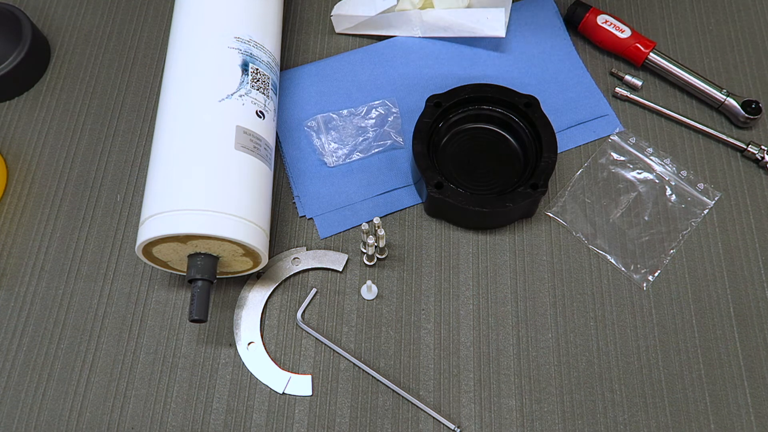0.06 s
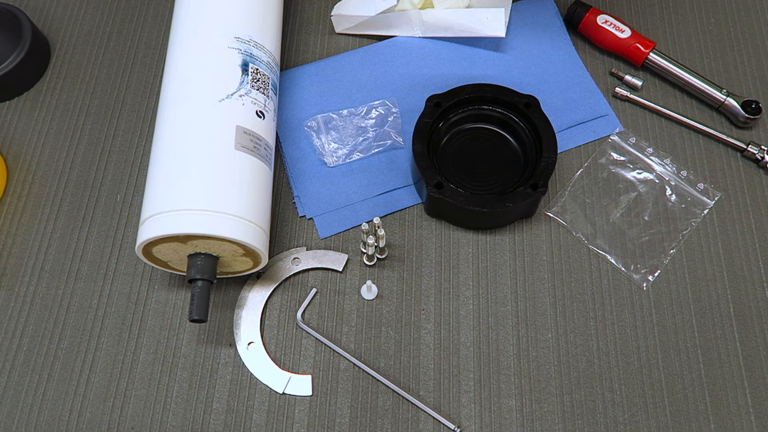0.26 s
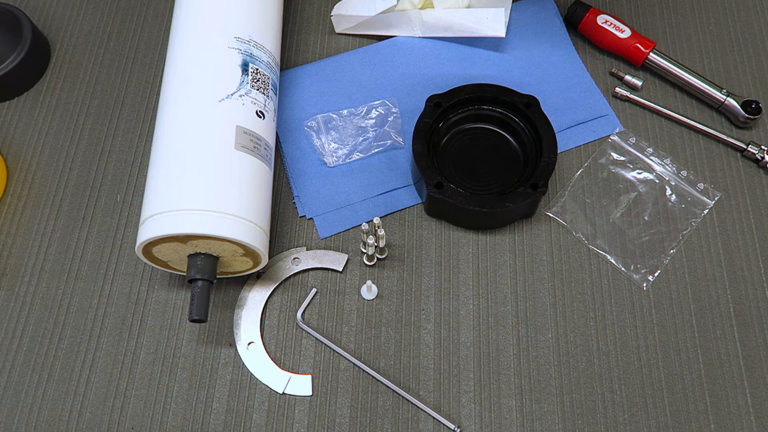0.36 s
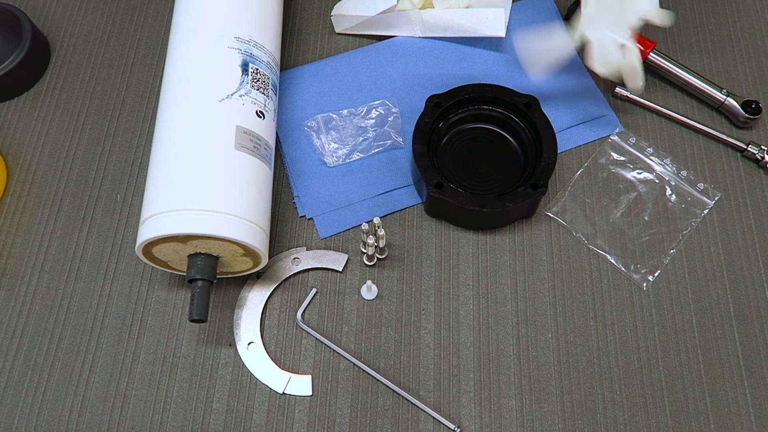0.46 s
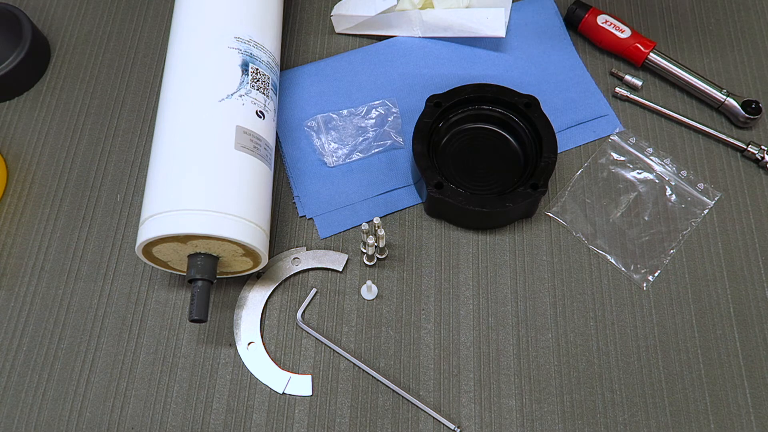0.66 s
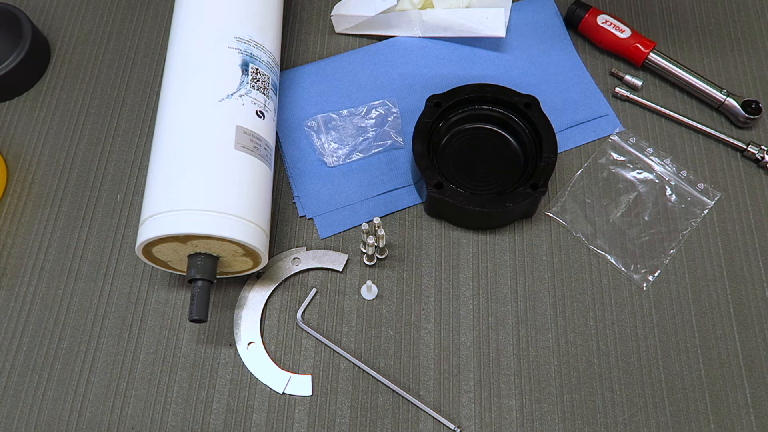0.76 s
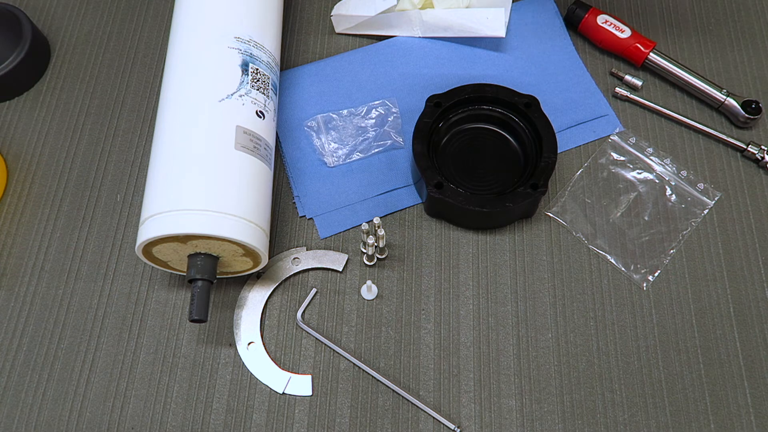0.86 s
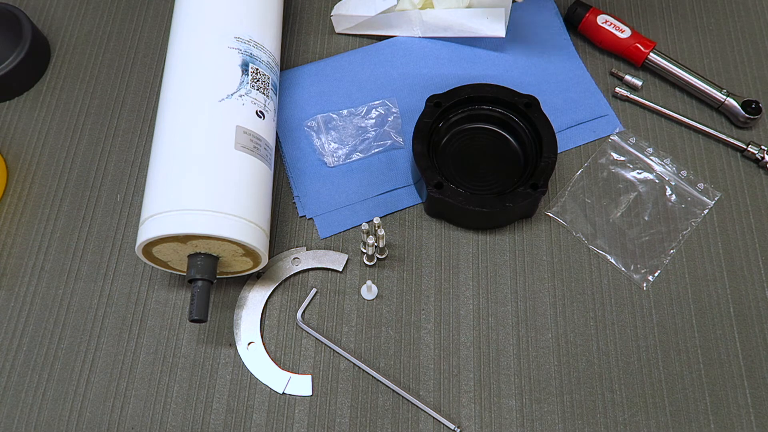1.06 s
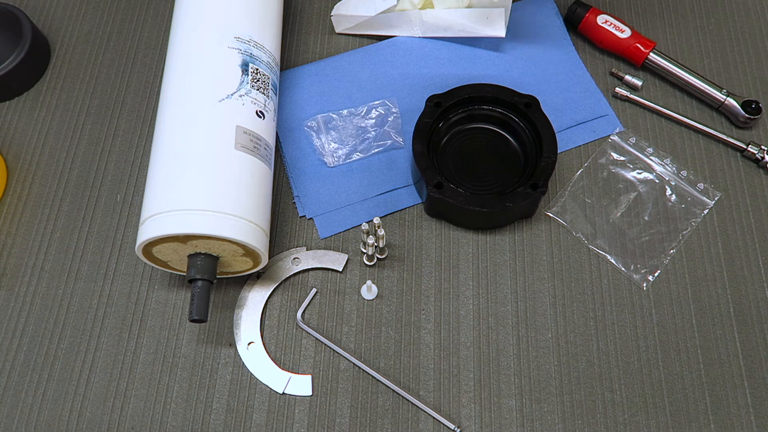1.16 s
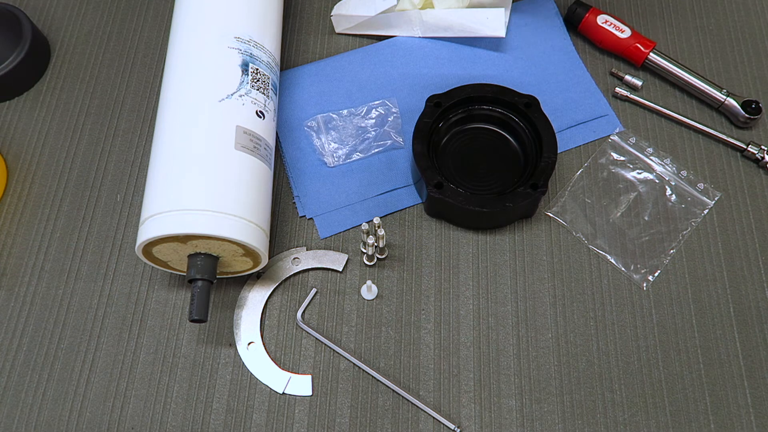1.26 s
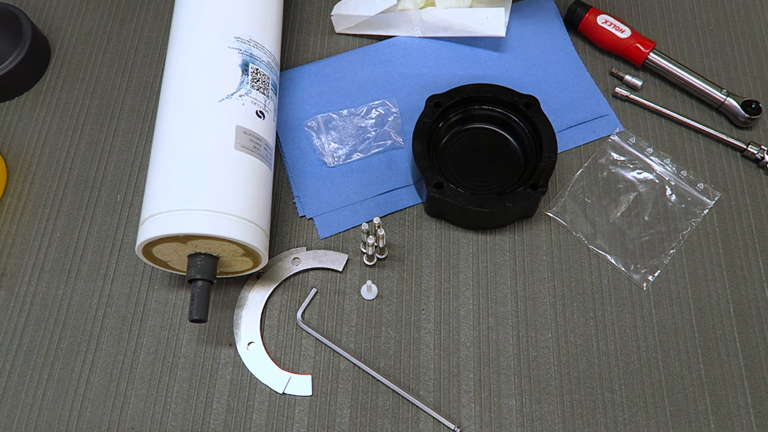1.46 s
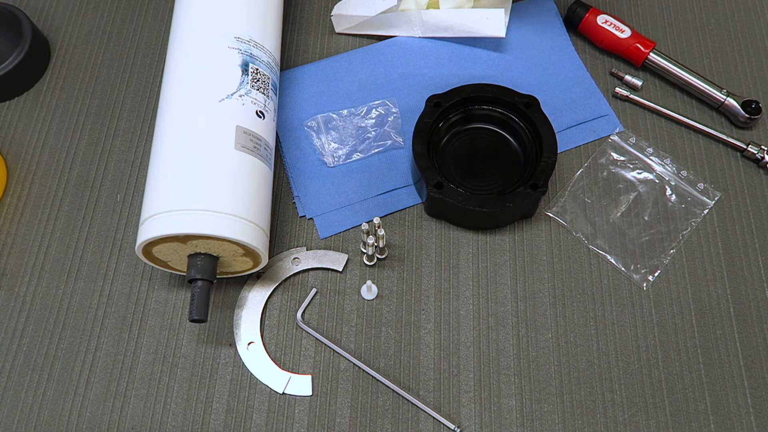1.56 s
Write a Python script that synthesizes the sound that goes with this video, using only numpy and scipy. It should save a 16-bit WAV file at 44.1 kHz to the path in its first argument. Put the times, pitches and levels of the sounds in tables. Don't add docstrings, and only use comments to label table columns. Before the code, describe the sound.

A rubber glove ticks and crackles as it peels, then snaps off loudly close to the microphones; a second, softer snap follows farther off, echoing in a hard room before quiet ventilation noise.

```python
import sys
import numpy as np
from scipy import signal
from scipy.fft import rfft, irfft, next_fast_len
from scipy.io import wavfile
from scipy.ndimage import map_coordinates

SR = 44100
rng = np.random.default_rng(int(sys.argv[2]) if len(sys.argv) > 2 else 0)


def magnitude_from_level(level_db):
    exponent = np.asarray(level_db, float) / 20
    return 10 ** exponent


def wav_out(sig):
    wavfile.write(sys.argv[1], SR, np.round(np.clip(np.atleast_2d(sig).T, -1, 1) * 32767).astype(np.int16))


N = 70560

# (time [s], peak level [dB], pitch [Hz], ring [cycles])
TICKS = [(.004, -32.5, 4100, 8.5), (.038, -35.5, 13000, 3.92), (.0468, -42, 11000, 4.5),
         (.0503, -27, 4500, 2.5), (.0875, -45, 11000, 1.4), (.0916, -44, 10000, 6.3),
         (.097, -45, 5000, 3.7), (.109, -30, 4100, 5.1), (.1215, -19.5, 12000, 2.8),
         (.1296, -41, 11000, 3.3), (.1575, -30, 13000, 3.8), (.158, -35, 5000, 4.8),
         (.187, -32.5, 11500, 6.6), (.188, -40, 8000, 5), (.2075, -30, 7000, 4.4), (.2213, -37.5, 4200, 4),
         (.3853, -26.5, 2150, 5), (.3846, -29, 3500, 4), (.385, -40, 6000, 4), (.0753, -50, 11000, 3),
         (.1165, -48, 7000, 3), (.1783, -46, 6500, 3), (.2105, -31.5, 4010, 5), (1.005, -42, 11000, 4),
         (1.2215, -52, 6300, 6), (1.222, -52, 8200, 6), (1.4805, -52, 3000, 5), (1.5255, -59, 6500, 2.82),
         (1.598, -48, 10000, 3)]
# (time [s], peak level [dB], pitch [Hz], ring [cycles])
FLAPS = [(.2396, -12.5, 3300, 6.8), (.2443, -6.5, 3300, 4.2), (.2445, -14, 12500, 7),
         (.2462, -9.5, 3600, 1.4), (.2472, -1.5, 2700, 3), (.2493, -10.5, 2980, 2.8),
         (.2508, -8.5, 1500, 2.4), (.2525, -20, 10500, 3.8), (.2573, -20, 3050, 6), (.460, -27, 10500, 7.7),
         (.4737, -20, 2900, 5), (.4782, -11, 2390, 3.5), (.4795, -15, 1650, 4), (.4808, -9, 2350, 4.4),
         (.4835, -11, 2980, 3.1), (.4755, -18.5, 2950, 5.5), (.5005, -16, 3600, 4), (.504, -11.5, 840, 3.5),
         (.5018, -18, 1700, 5), (.5068, -16, 1300, 3), (.5054, -14, 3160, 7.8), (.5095, -10.5, 1250, 1.5),
         (.5122, -22, 2800, 8), (.2412, -18, 1500, 3), (.2608, -22, 2400, 5), (1.557, -37, 835, 4)]
# (time [s], level [dB], centre [Hz], time to lose 20 dB [s])
RIPS = [(.2015, -38, 7500, .004), (.2068, -32, 2200, .003), (.2103, -28, 6000, .006),
        (.2205, -33, 8500, .005), (.2262, -33, 4200, .005), (.2385, -20, 5000, .005),
        (.2415, -19, 3200, .006), (.2445, -13, 3400, .008), (.2485, -15, 2300, .01),
        (.2555, -24, 3300, .015), (.4597, -24, 8500, .006), (.4625, -29, 10500, .005),
        (.4708, -26, 9500, .006), (.478, -28, 9500, .004), (.4812, -24, 6200, .005),
        (.4998, -24, 4200, .008), (.503, -23, 3800, .008), (.5095, -27, 4500, .008),
        (.4655, -30, 4500, .008), (.474, -27, 4200, .008), (.487, -33, 4000, .015),
        (1.5245, -50, 6000, .005), (1.5278, -49, 2900, .005), (1.5405, -47, 4200, .006),
        (1.5945, -50, 3500, .008)]
# (time [s], level [dB], grain pitch [Hz])
PEEL = [
    (0, -46, 2205),
    (.055, -44.5, 2500),
    (.075, -51, 2500),
    (.1, -43.5, 4000),
    (.14, -52, 2000),
    (.19, -39.5, 1239),
    (.2, -48.5, 2000),
]
# (time [s], level [dB], grain pitch [Hz])
FIRST_PULL = [
    (.199, -55, 4000),
    (0.201, -36.5, 4000),
    (0.21, -36, 4000),
    (0.222, -32, 3200),
    (0.239, -28, 3000),
    (0.247, -14, 5180),
    (.251, -17, 4000),
    (0.26, -23.5, 4060),
    (.275, -63, 3000),
]
# (time [s], level [dB], grain pitch [Hz])
SECOND_PULL = [
    (.445, -44, 2200),
    (.456, -35, 3000),
    (.468, -30, 2800),
    (.477, -25, 2600),
    (.486, -33, 2500),
    (.499, -37, 2500),
    (.502, -23, 2400),
    (.511, -23, 1800),
    (.525, -60, 1930),
]
# (time [s], level [dB], grain pitch [Hz])
SHUFFLE = [
    (1.47, -63.5, 4000),
    (1.489, -59.5, 5000),
    (1.517, -62, 4000),
    (1.527, -48.5, 3200),
    (1.546, -47, 2200),
    (1.563, -54.5, 1200),
    (1.58, -60, 2000),
    (1.6, -55, 3000),
]
# (time [s], peak level [dB], pitch [Hz], ring [cycles])
THUMPS = [(.205, -37, 115.2, 15), (.225, -37, 233, 8), (.246, -23, 450, 4), (.243, -17.5, 375, 5.1),
          (0.216, -28, 305, 5), (.25, -34.5, 69.5, 2.2), (.465, -30, 365, 7), (.545, -34, 354, 9),
          (.48, -41, 76, 2.8), (.503, -20, 505, 5.6), (0.504, -31.5, 234.6, 7.6), (0.505, -37.5, 114, 24),
          (.468, -38, 170, 4), (.508, -37, 168, 8.6), (1.312, -41, 35, 1.5), (1.541, -69, 120, 5),
          (1.55, -44.5, 456, 9.5), (1.546, -42, 840, 8.1)]

# (frequency [Hz], level [dB])
RUBBER_RADIATION = [(20, -59.5), (150, -5), (400, -4), (1000, 0), (6000, 3.5), (12000, 1.5), (15000, 0.5),
                    (16500, -36)]
# (frequency [Hz], time to lose 60 dB [s])
ROOM_DECAY = [(100, 0.47), (300, 0.81), (700, 0.58), (1800, 0.84), (4800, 0.59), (9000, 0.44),
              (13000, 0.41)]
# (frequency [Hz], level [dB])
ROOM_COLOUR = [(130, -25), (220, 3), (330, 9.5), (1000, 3.5), (3000, 0.5), (6000, -1), (14000, 2.5)]
# (frequency [Hz], correlation [-1 to 1])
ROOM_ALIKE = [(60, 1), (240, 0.95), (950, 0.982), (3770, 0.91), (15000, -0.7)]
# (frequency [Hz], side over mid [dB])
DIRECT_SIDE = [(200, -21.5), (500, -17), (2000, -43), (6000, -20), (12000, -10.5)]
# (frequency [Hz], left over right [dB])
MICROPHONE_LEAN = [(100, 0.3), (300, -4), (700, 0)]

# (frequency [Hz], level [dB per Hz])
AIR_COLOUR = [(20, -0.5), (60, -7), (119, -6), (330, -12), (1270, -12.5), (4000, -22.5), (12500, -38),
              (15500, -50)]
# (frequency [Hz], correlation [-1 to 1])
AIR_ALIKE = [(25, 1), (60, .95), (120, .8), (240, 0.2), (950, -0.023), (3770, 0.39), (15000, -0.37)]
# (frequency [Hz], level [dB per Hz])
RUMBLE_COLOUR = [(60, -28.5), (170, -4.5), (450, -3.5), (1000, -19), (2500, -42)]
# (time [s], level [dB])
RUMBLE_SWELL = [
    (0, -46),
    (.2, -43),
    (.8, -59),
    (1.081, -58.5),
    (1.14, -52.5),
    (1.3, -56.5),
    (1.45, -57.5),
    (1.6, -59.5),
]
# (frequency [Hz], rms level [dB], width [Hz])
TONES = [
    (121, -65, 9.5),
    (8070, -82.5, 60),
]

TICK_RISE, FLAP_RISE = 0.18, 0.71
CRACK_DB, CRACK_S, CRACK_OVER = -9, 0.0016, 2.34
RIP_WIDE, RIP_RISE_S = 1.6, .0004
GRAINS_PER_S, GRAIN_CYCLES, SPREAD_OCT = 14000, 1.63, 1.291
SIZE_DB, TILT_DB_PER_OCT = 2.2, 1
FIRST_WET_DB, SECOND_WET_DB, SECOND_S = -11, -7.5, .44
GAP_S = .003
PATHS, FLUTTER_S = 3, .007
AIR_DB = -54
TOP, KNEE, TOP_HZ = .99, 6, 16450


def unit(x):
    return x / np.sqrt(np.mean(x ** 2) + 1e-20)


def along(points, hz):
    f, v = np.transpose(points)
    return np.interp(np.log(hz + 1), np.log(f + 1), v)


def filtered(x, response):
    n = x.shape[-1]
    m = next_fast_len(n + 8192)
    return irfft(rfft(x, m) * response(np.fft.rfftfreq(m, 1 / SR)), m)[..., :n]


def paired(pair, spectrum, alike):
    ends = [(10, -120)] + list(spectrum) + [(21000, -120)]

    def mid_side(hz):
        turn = np.arccos(np.clip(along(alike, hz), -1, 1)) / 2
        return magnitude_from_level(along(ends, hz)) * np.array([np.cos(turn), np.sin(turn)])

    mid, side = filtered(pair, mid_side)
    return unit(np.array([mid + side, mid - side]))


def rings(s, db, hz, cycles, size, rise=.3):
    k = np.arange(size)
    turns = np.clip(hz, 20, 16000)[:, None] * k / SR
    decay_db = 20 * turns / np.maximum(cycles, .3)[:, None]
    waves = magnitude_from_level(db[:, None] - decay_db) * np.sin(2 * np.pi * turns)
    waves = waves * (1 - np.exp(-turns / max(rise, .05)))
    at = np.round(np.clip(s, 0, None) * SR).astype(int)[:, None] + k
    return np.bincount(at.ravel(), waves.ravel(), N + size + SR)[:N]


def gloves():
    rubber = snaps(TICKS, TICK_RISE) + snaps(FLAPS, FLAP_RISE) + rips()
    rubber = rubber + sum(crackle(rows) for rows in (PEEL, FIRST_PULL, SECOND_PULL, SHUFFLE))
    return filtered(rubber, lambda hz: magnitude_from_level(along(RUBBER_RADIATION, hz)))


def snaps(rows, rise):
    s, db, hz, cycles = np.transpose(rows)
    out, t = np.zeros(N + 400), np.arange(300) / SR
    noises = rng.standard_normal((len(s), len(t)))
    for start, level_db, pitch, noise in zip(s, db, hz, noises):
        lowpass = signal.butter(3, min(CRACK_OVER * pitch, .45 * SR), fs=SR, output="sos")
        dull = unit(signal.sosfilt(lowpass, noise))
        out[round(start * SR):][:len(t)] += magnitude_from_level(level_db + CRACK_DB - 20 * t / CRACK_S) * dull
    return out[:N] + rings(s, db + 5, hz, cycles, size=512, rise=rise)


def rips():
    out, t = np.zeros(N + 900), np.arange(800) / SR
    noises = rng.standard_normal((len(RIPS), len(t)))
    for (s, level_db, hz, fade_s), noise in zip(RIPS, noises):
        edges = [hz / RIP_WIDE, min(hz * RIP_WIDE, .45 * SR)]
        band = signal.butter(2, edges, "band", fs=SR, output="sos")
        shape = magnitude_from_level(level_db - 20 * t / max(fade_s, .001)) * (1 - np.exp(-t / RIP_RISE_S))
        out[round(s * SR):][:len(t)] += shape * unit(signal.sosfilt(band, noise))
    return out[:N]


def crackle(rows):
    s, db, hz = np.transpose(rows)
    length_s = s[-1] - s[0]
    count = int(GRAINS_PER_S * .12 * (1 + length_s // .12))
    at = s[0] + rng.random(count) * length_s
    octaves = SPREAD_OCT * rng.standard_normal(count)
    pitch = np.interp(at, s, hz) * 2 ** octaves
    slip_db = SIZE_DB * rng.exponential(size=count) + TILT_DB_PER_OCT * octaves
    cycles = np.full(count, GRAIN_CYCLES)
    even = rings(at, slip_db, pitch, cycles, size=256)
    slips = rings(at, np.interp(at, s, db) + slip_db, pitch, cycles, size=256)
    return slips / np.sqrt(np.sum(even ** 2) / (length_s * SR))


def table():
    return rings(*np.transpose(THUMPS), size=16384)


def ports(x):
    smear = rng.standard_normal(200) * magnitude_from_level(-np.arange(200) / 8)
    smeared = np.convolve(x, smear / np.linalg.norm(smear))[:N]
    side = filtered(smeared, lambda hz: magnitude_from_level(along(DIRECT_SIDE, hz)))
    return np.array([x + side, x - side])


def moving_room(x):
    turn = 2 * np.pi * np.arange(N) / SR / FLUTTER_S
    echo = 0
    for k in range(PATHS):
        share = (1 + np.cos(turn - 2 * np.pi * k / PATHS)) / PATHS
        echo = echo + room(x * share)
    return echo * np.sqrt(2)


def room(x):
    hz, t, z = signal.stft(rng.standard_normal((2, SR)), SR, nperseg=256)
    decay = magnitude_from_level(-60 * t / along(ROOM_DECAY, hz)[:, None])
    tail = signal.istft(z * decay, SR, nperseg=256)[1]
    tail = paired(tail, ROOM_COLOUR, ROOM_ALIKE) / np.sqrt(tail.shape[1])
    tail = tail * np.clip(np.arange(tail.shape[1]) / (GAP_S * SR), 0, 1)
    return signal.fftconvolve(x[None], tail, axes=1)[:, :N]


def background():
    return ventilation() + far_rumble() + tones()


def ventilation():
    return magnitude_from_level(AIR_DB) * paired(rng.standard_normal((2, N)), AIR_COLOUR, AIR_ALIKE)


def far_rumble():
    s, db = np.transpose(RUMBLE_SWELL)
    lumps = map_coordinates(rng.standard_normal(60), [np.arange(N) * 25 / SR])
    level_db = np.interp(np.arange(N) / SR, s, db) + 1.6 * lumps
    return magnitude_from_level(level_db) * paired(rng.standard_normal((2, N)), RUMBLE_COLOUR, AIR_ALIKE)


def tones():
    out = np.zeros(N)
    for hz, level_db, wide in TONES:
        band = filtered(rng.standard_normal(N), lambda f: np.exp(-((f - hz) / wide) ** 2))
        out += magnitude_from_level(level_db) * unit(band)
    return out


def scene():
    rubber, knocks = gloves(), table()
    wet = magnitude_from_level(np.where(np.arange(N) < SECOND_S * SR, FIRST_WET_DB, SECOND_WET_DB))
    echo = moving_room(wet * rubber) + room(wet * knocks)
    return ports(rubber + knocks) + echo + background()


def roll_off(x):
    return signal.sosfilt(signal.butter(12, 16660, fs=SR, output="sos"), x)


def record(dry):
    halves = np.array([[.5], [-.5]])
    leaned = filtered(dry, lambda hz: magnitude_from_level(along(MICROPHONE_LEAN, hz) * halves))
    rounded = leaned / (1 + np.abs(leaned / TOP) ** KNEE) ** (1 / KNEE)
    mix = filtered(rounded, lambda hz: hz < TOP_HZ)
    return roll_off(mix)


dry = scene()
out = record(dry)
wav_out(out)
```